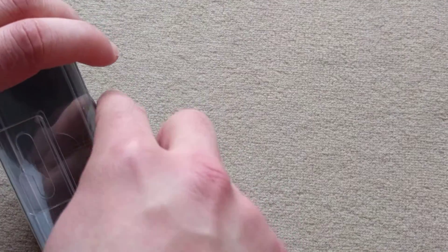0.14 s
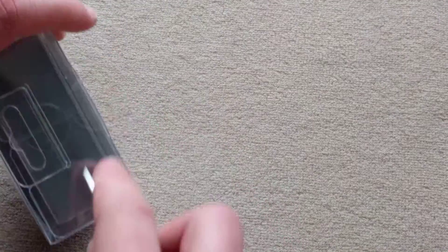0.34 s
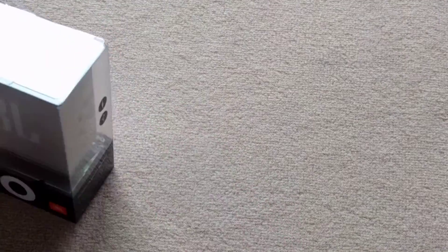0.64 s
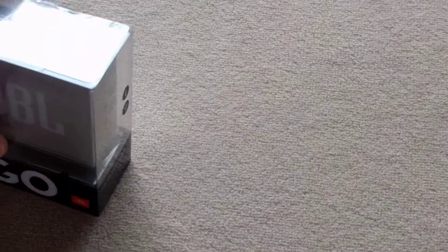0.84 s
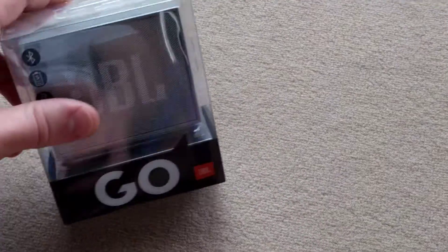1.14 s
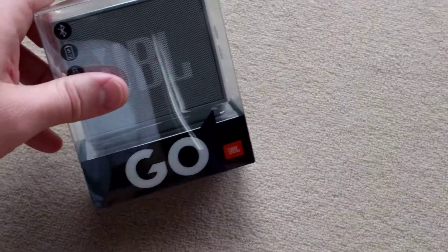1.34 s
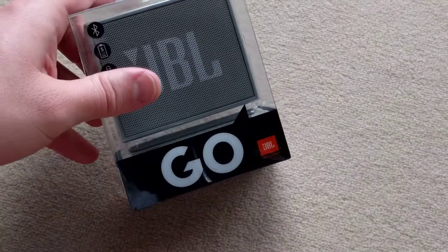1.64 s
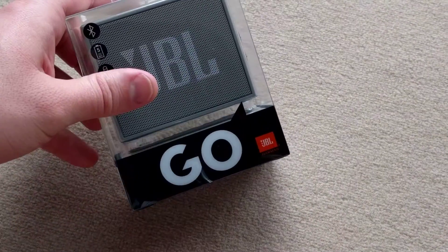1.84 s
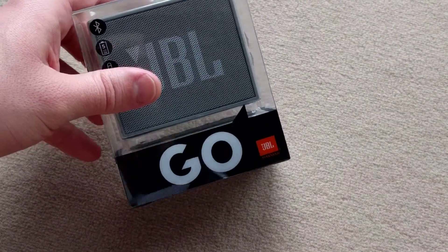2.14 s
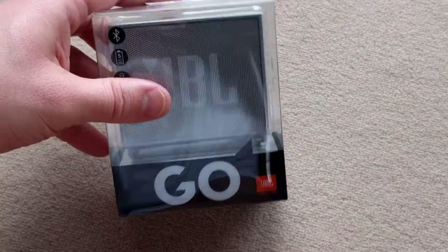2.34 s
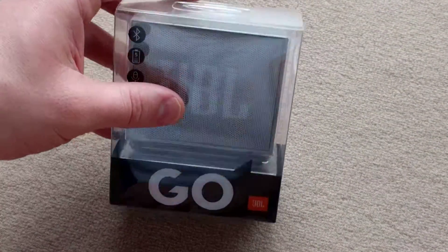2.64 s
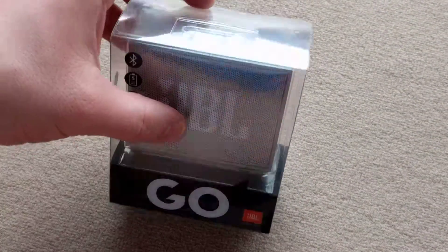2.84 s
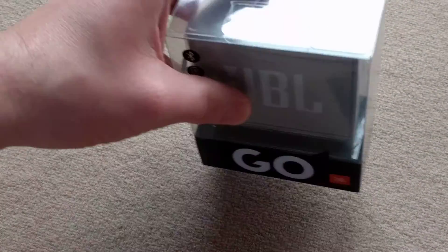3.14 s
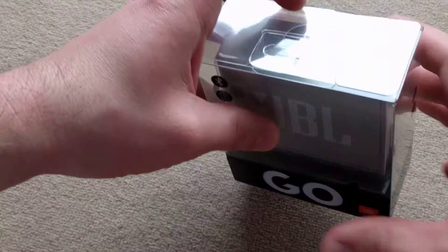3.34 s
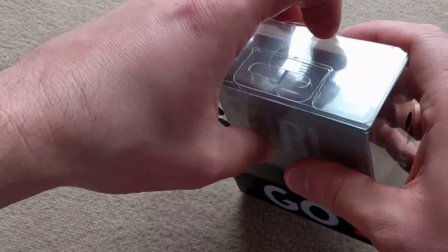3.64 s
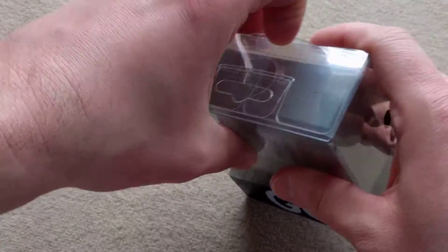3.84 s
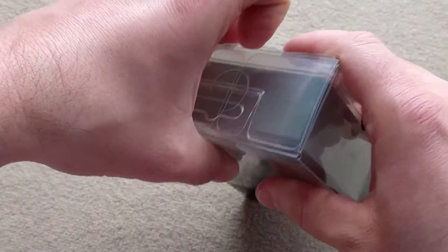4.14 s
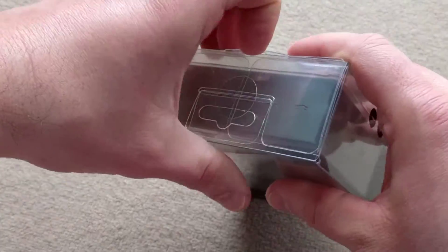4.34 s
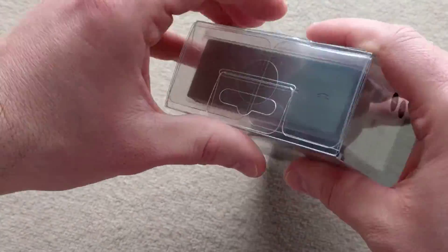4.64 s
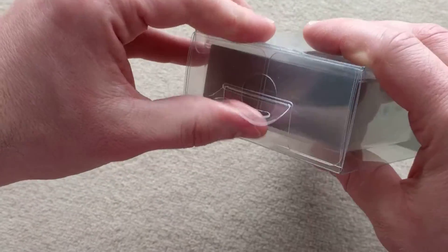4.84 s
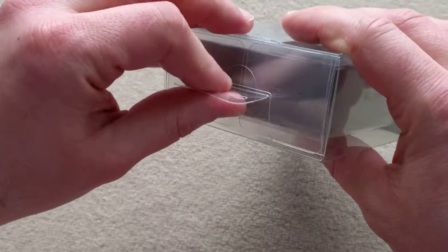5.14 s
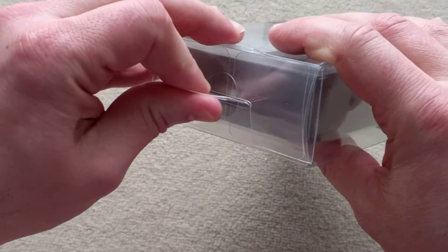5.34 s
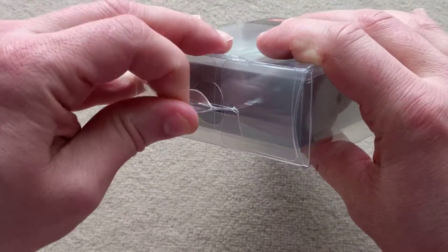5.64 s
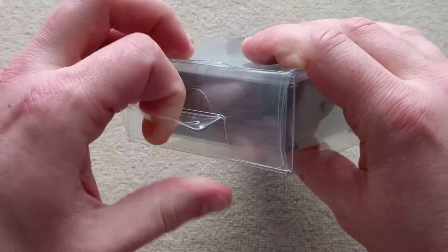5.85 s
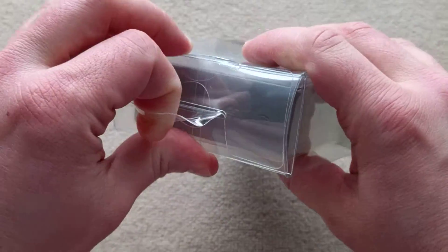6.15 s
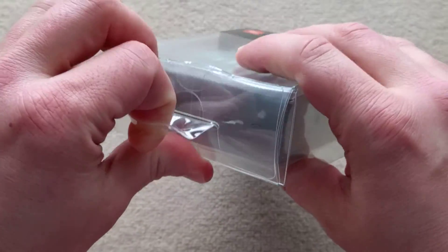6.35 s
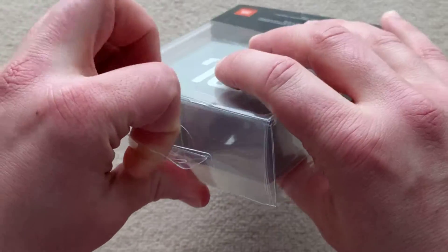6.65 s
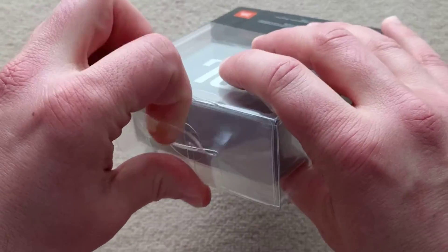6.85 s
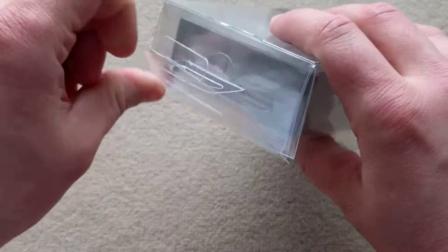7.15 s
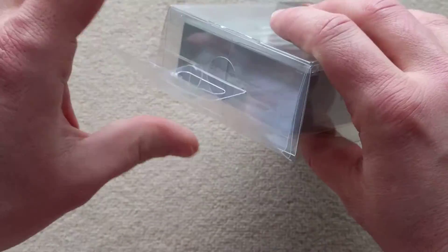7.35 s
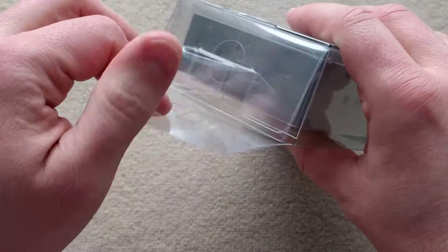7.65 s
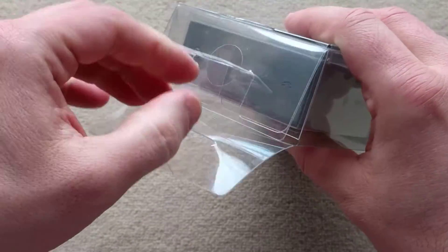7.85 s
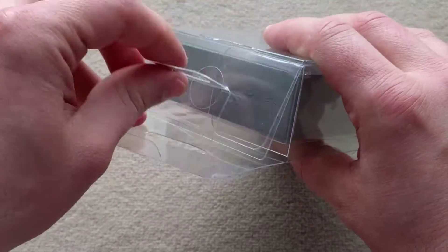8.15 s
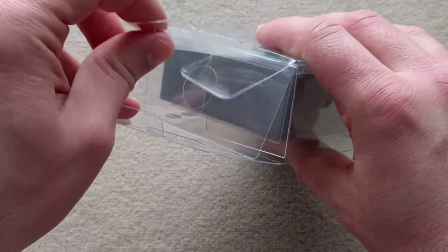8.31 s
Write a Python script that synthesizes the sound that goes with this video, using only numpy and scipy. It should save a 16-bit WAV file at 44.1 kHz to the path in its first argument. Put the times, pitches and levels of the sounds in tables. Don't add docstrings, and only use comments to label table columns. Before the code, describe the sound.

Hands turn and pry open a stiff clear plastic box up close; faint rustles, one sharp snap, then dense loud cracks as the lid bursts free.

```python
import sys
import numpy as np
from scipy import signal
from scipy.fft import rfft, irfft, next_fast_len
from scipy.io import wavfile
from scipy.ndimage import uniform_filter1d, map_coordinates

SR = 44100
rng = np.random.default_rng(int(sys.argv[2]) if len(sys.argv) > 2 else 0)


def amplitude_ratio(level_db):
    exponent = np.asarray(level_db, float) / 20
    return 10 ** exponent


def int16_out(signal):
    q = np.round(np.clip(np.atleast_2d(signal).T, -1, 1) * 32767)
    wavfile.write(sys.argv[1], SR, q.astype(np.int16))


N = 373968


def along(points, hz, column=1):
    rows = np.array(points)
    return np.interp(np.log(hz + 1), np.log(rows[:, 0] + 1), rows[:, column])


def unit(x):
    return x / np.sqrt(np.mean(x ** 2) + 1e-20)


def peak(x):
    return x / np.max(np.abs(x))


def hiss(spectrum, size=N):
    m = next_fast_len(size)
    gain = amplitude_ratio(along(spectrum, np.fft.rfftfreq(m, 1 / SR)))
    return unit(irfft(rfft(rng.standard_normal(m)) * gain, m)[:size])


def wobble(rate):
    knots = rng.standard_normal(int(N * rate / SR) + 4)
    return map_coordinates(knots, [np.arange(N) * rate / SR])


def ring(modes, t, spread, rise):
    x = np.zeros(len(t))
    for hz, t60 in modes:
        detune, level = rng.standard_normal(2)
        decay = amplitude_ratio(4 * level - 60 * t / t60)
        x += decay * np.sin(2 * np.pi * hz * (1 + spread * detune) * t)
    return peak(x * (1 - np.exp(-t / rise)))


def add(track, s, x):
    track[max(round(s * SR), 0):][:len(x)] += x


# frequency in Hz, level in dB per Hz.
SELF_NOISE = [(180, -31.5), (300, 1.5), (1480, -17), (4160, -14), (6620, -11.5), (16000, -4.5)]


def self_noise():
    return amplitude_ratio(-83.0) * hiss(SELF_NOISE)


# frequency in Hz, time to fall 60 dB in seconds, level in dB.
ROOM = [(200, 0.32, -0.5), (600, 0.24, -3), (1500, 0.22, -2), (4000, 0.28, -5), (7000, 0.21, -5),
        (14000, 0.13, 2.5)]


def tails(count):
    hz, t, z = signal.stft(rng.standard_normal((count, 14000)), SR, nperseg=256)
    decay_db = along(ROOM, hz, column=2)[:, None] - 60 * t / along(ROOM, hz)[:, None]
    x = signal.istft(z * amplitude_ratio(decay_db), SR, nperseg=256)[1][:, :14000]
    return x / np.linalg.norm(x, axis=1, keepdims=True)


# delay in seconds, level in dB.
WALLS = [(.0045, -16.5), (0.013, -23), (.035, -25.5)]


def room(hit, diffuse, wet_db):
    age = np.arange(len(diffuse)) / SR
    tail = amplitude_ratio(wet_db) * diffuse * (1 - np.exp(-age / 0.0098))
    early = np.zeros(3000)
    for delay, db in WALLS:
        early += amplitude_ratio(db + rng.normal(-15, 3) - 60 * np.abs(age[:3000] - delay) / 0.013)
    tail[:3000] += early * rng.standard_normal(3000)
    energy = np.cumsum(np.abs(rfft(hit, 16384)) ** 2)
    k = np.arange(8193)
    low, high = k / 1.1 - 10, np.minimum(k * 1.1 + 10, 8192)
    colour = np.sqrt((np.interp(high, k, energy) - np.interp(low, k, energy)) / (high - low))
    out = irfft(rfft(np.pad(tail, (40, 0)), 16384) * colour, 16384)[:15000]
    out[:len(hit)] += hit
    return out


# moment of most pressure in
# seconds, seconds to rise 20 dB, seconds to fall 20 dB, slide level in dB, rustle against the slide in dB.
STROKES = [(0.005, 0.2, 0.02, -74.5, 4.5), (0.081, 0.062, 0.1, -82.4, 8.5), (0.223, 0, 0.05, -69, 7.7),
           (0.448, 0.13, 0.78, -67.5, -2.5), (0.687, 0.45, 0.1, -77, -9.5),
           (1.075, 0.3, 0.07, -60.5, -2.2), (1.251, 0.13, 0.054, -67, 1), (1.438, 0.15, 0.12, -70, 1),
           (1.774, 0.1, 0.36, -78.9, 2.5), (2.104, 0.09, 0.18, -54.5, -22),
           (2.283, 0.24, 0.14, -65.5, -2), (2.479, 0.02, 0.13, -66, -9), (2.631, 0.04, 0.53, -70, 0.5),
           (2.787, 0.173, 0.12, -60.0, -18.0), (3.142, 0.05, 0.55, -64, -21.0),
           (3.428, 0.283, 0.2, -75.5, 7.5), (3.745, 0.202, 0.028, -63, 0.6),
           (3.857, 0.13, 0.04, -69.5, 0), (3.972, 0.12, 0.073, -64.5, -3),
           (4.162, 0.038, 0.055, -68.1, -1.5), (4.309, 0.15, 0.053, -71, 0.5),
           (4.488, 0.08, 0.0653, -64.5, 4), (4.745, 0.041, 0.043, -76.1, 4.5),
           (4.855, 0.1, 0.05, -76.0, 1.7),
           (5.013, 0.02, 0.17, -76.4, 2), (5.244, 0.02, 0.346, -81.0, 3.8), (5.396, 0.3, 0.1, -77, 6),
                (5.601, 0.0257, 0.13, -58.5, -10.5), (5.79, 0.08, 0.16, -66.5, 8.0),
                (6.149, 0.1, 0, -59, -1.5), (6.249, 0.1, 0.06, -65, -5.0), (6.46, 0.15, 0.7, -80.4, 7.6),
                (6.645, 0.351, 0.15, -66, 0.9), (6.794, 0.075, 0.064, -53.5, -5.3),
                (7.006, 0.01, 0.1139, -34.5, -13), (7.091, 0.139, 0.11, -50, 7.5),
                (7.297, 0.0142, 0.04, -39, -8), (7.352, 0.07, 0.1, -60.6, 5.5),
                (7.62, 0.21, 0.16, -54.5, -7.3), (7.913, 0.06, 0.13, -55.5, 0.5),
                (8.065, 0.098, 0.075, -51.5, -2.2), (8.253, 0.057, 0.08, -61, 1.8),
                (8.447, 0.06, 0.092, -59.0, -1)]


def strokes():
    roundness = 1.164
    t = np.arange(0, N, 32) / SR
    s, rise_s, fall_s, db, rustle_db = np.transpose(STROKES)[:, :, None]
    distance = np.abs(t - s) / np.where(t < s, rise_s, fall_s)
    swell = amplitude_ratio(db - 20 * distance ** roundness)
    return [np.interp(np.arange(N) / SR, t, gain.sum(axis=0)) for gain in (swell, amplitude_ratio(rustle_db) * swell)]


# frequency in Hz, level in dB per Hz.
RUMBLE = [(8.8, -21.5), (15, -5.5), (27, -13), (151, -14.5), (269, -22.5), (400, -33.5), (520, -52),
          (880, -120)]
# time in seconds, rumble level in dB.
SHAKE = [
    (0.0, -72),
    (0.9, -73),
    (1.5, -79),
    (1.96, -74.5),
    (2.4, -77),
    (3.4, -74.5),
    (4.6, -80),
    (5.4, -74),
    (7.04, -76),
    (8.48, -82),
]


def shaking(grip, slide_gain):
    level_db = np.interp(np.arange(N) / SR, *np.transpose(SHAKE))
    shake = amplitude_ratio(level_db + 1.2 * grip + 2.5 * wobble(9.9))
    return shake * slide_gain ** .26 * amplitude_ratio(20.5) * hiss(RUMBLE)


# frequency in Hz, level in dB per Hz.
SLIDE = [(1180, -37), (2000, -10), (2650, -12.5), (4510, -6.5), (7070, -4.5), (11200, -15.5),
         (15100, -15.5), (16500, -30)]
# frequency in Hz, level in dB per Hz.
RUSTLE = [(130, -31), (230, 0.5), (401, -2), (908, -3.5), (1290, -6), (3000, -12.5), (3900, -39.5),
          (6600, -120)]


def hands():
    slide_gain, rustle_gain = strokes()
    grip = wobble(25)
    slips = (rng.random(N) < 80 / SR) * rng.random(N)
    slip_decay = np.exp(-1 / (.0015 * SR))
    ticks = amplitude_ratio(1.5 * wobble(500)) + 1.1 * signal.lfilter([1], [1, -slip_decay], slips)
    slide = slide_gain * amplitude_ratio(1.8 * grip) * unit(ticks * hiss(SLIDE))
    rustle = rustle_gain * amplitude_ratio(1.1 * grip + 2.1 * wobble(48)) * unit(ticks * hiss(RUSTLE))
    return slide + rustle + shaking(grip, slide_gain)


# time in seconds, level in dB, pitch in Hz.
THUDS = [
    (3.47, -51, 55),
    (6.27, -47.5, 114.4),
    (6.54, -41.5, 140),
    (7.0, -38.5, 115),
    (7.3, -44, 124),
    (7.89, -47, 168.3),
    (8.035, -44, 130),
    (8.245, -43, 105),
    (8.4, -39.5, 115),
]


def thuds():
    out, t = np.zeros(N + SR), np.arange(4096) / SR
    for s, db, hz in THUDS:
        push = ring([(hz, .045), (2.197 * hz, .075)], t, spread=.01, rise=.006)
        add(out, s - .003, amplitude_ratio(db) * push)
    return out[:N]


# time in seconds, pitch in Hz, level in dB.
SQUEAKS = [
    (0.033, [(.984, 1600, -60), (.991, 1540, -40.5), (.9945, 1500, -49), (.9965, 1400, -44), (1.001, 1300, -55), (1.003, 1180, -52), (1.008, 1100, -70)]),
    (0.33, [(1.008, 830, -70), (1.013, 960, -54), (1.021, 1090, -50.5), (1.028, 1060, -56.5), (1.032, 1000, -53), (1.039, 900, -72)]),
    (.1, [(5.016, 1500, -70.5), (5.022, 1430, -51), (5.026, 935, -70.5), (5.034, 773, -54), (5.05, 750, -72)]),
    (0.91, [(8.188, 1980, -58), (8.195, 2095, -55), (8.203, 2085, -64), (8.21, 2280, -53), (8.228, 2320, -63)]),
]


def squeak():
    out, waver, flutter = np.zeros(N), wobble(390), wobble(250)
    for bright, rows in SQUEAKS:
        s, hz, db = np.transpose(rows)
        span = np.arange(round(s[0] * SR), round(s[-1] * SR))
        pitch = np.interp(span / SR, s, hz) * (1 + 0.053 * waver[span])
        phase = 2 * np.pi * np.cumsum(pitch) / SR
        tone = np.sin(phase) + bright * (np.sin(2 * phase) + np.sin(3 * phase))
        out[span] = amplitude_ratio(np.interp(span / SR, s, db) + 1.3 * flutter[span]) * tone
    return out


# frequency in Hz, time to fall 60 dB in seconds.
BOX = [(251, 0.065), (194, .04), (302.6, 0.048), (377, 0.049)]
# time in seconds, panel level in dB, panel pitch in Hz, box against it in dB.
KNOCKS = [(2.594, -47.5, 747, -23), (3.46, -50, 774, -16), (5.732, -65, 762, 6), (5.982, -63.5, 1130, -16),
          (6.13, -50, 730, -20), (6.151, -51, 714, -25), (6.222, -62, 690, -6), (6.396, -47.5, 730, 4.5),
          (6.441, -67, 742, 7.5), (7.522, -83, 703, 24.5), (8.25, -59.5, 803, -5)]


def knocks():
    out, t = np.zeros(N + SR), np.arange(4096) / SR
    for (s, db, hz, box_db), decay in zip(KNOCKS, tails(count=len(KNOCKS))):
        hit = ring([(hz, .028), (1.22 * hz, .02), (0.914 * hz, .02)], t, spread=0.0055, rise=0.006)
        hit += amplitude_ratio(box_db + 1) * ring(BOX[:1], t, spread=0.028, rise=0.0033)
        add(out, s - .0015, amplitude_ratio(db + 2.5) * room(hit, decay, wet_db=-3.5))
    return out[:N]


# frequency in Hz, level in dB.
TOP = [(7000, -31), (10000, 1.5), (13000, -5.5), (15500, -10), (16500, -37)]


def crack(hz, db, film, tab, t):
    rupture_s = .0006 * np.exp(0.08 * db)
    u = t / rupture_s
    burst = u * np.exp(-u) + 0.04 * np.exp(-t / 0.0063)
    hit = peak(burst * hiss(film, size=len(t)))
    hit += amplitude_ratio(-6.5) * ring([(hz, 0.015), (1.28 * hz, .008)], t, spread=.015, rise=0.00036)
    top_db = (-17 if tab else -20) + 2.9 * rng.standard_normal()
    hit += amplitude_ratio(top_db) * peak(burst * hiss(TOP, size=len(t)))
    return peak(hit)


# frequency in Hz, level in dB.
FLAP = [(700, -31.5), (1300, -3), (1720, -1), (2700, -9), (4000, -19.5)]
# frequency in Hz, time to fall 60 dB in seconds.
LID = [(1700, 0.033), (2650, 0.034), (5400, 0.026)]
# frequency in Hz, time to fall 60 dB in seconds.
PANEL = [(560, 0.03), (650, 0.013), (735, 0.045), (860, 0.034), (1000, 0.028), (1150, 0.0079)]


def box_body(flap_db, panel_db, loose, t):
    flap = t * np.exp(-t / 0.0022) * hiss(FLAP, size=len(t))
    box_db = panel_db - 8.5 + 6 * loose + 2.5 * rng.standard_normal()
    body = amplitude_ratio(flap_db + 1.5) * peak(flap)
    body += amplitude_ratio(flap_db - 4) * ring(LID, t, spread=0.07, rise=0.00057)
    body += amplitude_ratio(panel_db + 1.5) * ring(PANEL, t, spread=0.05, rise=0.0018)
    return body + amplitude_ratio(box_db) * ring(BOX, t, spread=.05, rise=0.0037)


# multiple of the crease pitch, level in dB.
CRACK = [(.25, -34), (.5, -9.5), (.8, -3.5), (1, 0), (1.25, -4), (1.6, -14.5), (2.4, -21), (4, -26)]
# time in seconds,
# crack peak in dB, flap against the crack in dB, panel against the crack in dB, crease pitch in Hz.
TAB = [
    (2.0458, -15.5, -45.5, -50, 6700),
    (2.0464, -8, -37.5, -47.5, 4900),
    (2.0468, -13, -45, -48, 6800),
    (2.0506, -19, -55, -60, 5410),
    (2.0588, -23, -55, -60, 5800),
]
# time in seconds, crack peak in
# dB, flap against the crack in dB, panel against the crack in dB, crease pitch in Hz.
CREASES = [(0.045, -41, -5, -27, 6350), (0.1802, -55.5, -12.5, -17, 6550), (0.219, -41.5, -13.5, -15, 6370),
           (0.4453, -54.5, -5.1, -18, 5400), (0.4611, -41.5, -10.5, -31, 6720),
           (0.7116, -45.5, -14, -33.5, 6570), (0.8228, -47.6, -6.0, -7.6, 3550),
           (0.875, -52.4, -6.0, -16.9, 4670), (1.7448, -45.3, -24, -34.5, 8010),
           (1.7795, -48.1, -33.7, -27.9, 5050), (1.8082, -57.2, -27.2, -20, 7040),
           (1.864, -48.5, -23.3, -24.7, 8050), (1.9702, -55.6, -15.7, -17.9, 6650),
           (2.5947, -44, -5, -2.8, 6270), (2.6342, -47, -21, -19, 5510), (2.9372, -36, -7.5, -23, 3620),
           (3.0463, -64.5, -20.3, -19.8, 6010), (3.1088, -60, -18.5, -21, 6460),
            (3.4406, -38.5, -3.5, -8.5, 4910), (3.4598, -41.5, -8, -2, 7320),
            (3.6294, -47.5, -6.2, -6.5, 6830), (3.6472, -18.5, -12.7, -21.3, 6200),
            (3.7028, -45.2, -29, -17.6, 3600), (3.8345, -59, -3.2, -12.5, 4910),
            (3.865, -49, -20.1, -37, 4520), (3.9434, -30, -12.5, -15.0, 6780),
            (3.9519, -33.5, -3.0, -16.4, 4700), (4.006, -36.5, -25, -41.2, 6070),
            (4.0198, -49.2, -11, -1.5, 5810), (4.1196, -39.2, -23.5, -30.1, 6100),
            (4.1614, -51.0, -2.5, -20.0, 5640), (4.2231, -58, -9.1, -4, 5250),
            (4.2709, -58.4, -20.8, -24.2, 5070), (4.3853, -44, -8.5, -14.7, 3550),
            (4.4353, -27.8, -10.5, -11.5, 5810), (4.449, -43.0, -22.8, -17.1, 5880),
            (4.7143, -57.8, -2, -18, 6480), (4.7383, -62.2, 0.5, -12.4, 6070),
            (4.8346, -55.6, -10.2, -14, 6370), (4.9972, -67, -5.5, -8.0, 3700),
           (5.0196, -53.3, -0.5, -1.8, 6090), (5.0669, -61.2, -21.0, -23.6, 5790),
           (5.0823, -67.9, -15.2, -12, 5840), (5.1962, -43.5, -7.5, -21, 3230),
           (5.2286, -49, -2.5, -14, 4030), (5.2648, -53.5, -16.4, -20.7, 6440),
           (5.2924, -56.9, -6.9, -14, 5840), (5.3141, -45.7, -9.5, -14.1, 5700),
           (5.3288, -59.5, -9.7, -26.7, 5880), (5.3364, -60.2, -17.5, -11.2, 6800),
           (5.3507, -60.4, -5.9, -26.7, 5960), (5.366, -40.5, -12.5, -46.7, 6400),
           (5.3842, -48, -14.6, -22, 4090), (5.4097, -47.5, -7, -17, 5750),
           (5.49, -52.5, -11.8, -14.7, 5340), (5.4974, -45.5, -7.5, -15.0, 7020),
           (5.5889, -52.5, -20.5, -22, 5150), (5.599, -52.5, -3.5, -7, 5250),
           (5.6085, -29.5, -12.5, -16, 5000), (5.6271, -42.1, -16.3, -13, 6440),
           (5.6425, -42, -10.0, -11.5, 3880), (5.7255, -45.5, -10, -23.9, 5900),
           (5.7573, -31.5, -16.3, -26.5, 3330), (5.7864, -32, -4, -17.5, 7800),
           (5.7903, -16.5, -19, -32.5, 7420), (5.8039, -34.0, -28.8, -23, 7700),
           (5.903, -60.8, -8.8, -6, 6180), (5.9196, -56.6, -12.6, -15.0, 6010),
           (5.9455, -46.5, -8.3, -11.5, 6550), (5.9825, -53, -6.6, -7, 5080),
           (6.0048, -47.7, -14, -13.7, 6180), (6.0311, -50.0, -4.0, -13.5, 7260),
           (6.0652, -32, -16.3, -17.3, 7220), (6.1583, -44.3, -12, -15, 7400),
           (6.207, -57, -14.2, -7, 5490), (6.262, -28.9, -10, -19.7, 5860),
           (6.3415, -56.4, 9.5, 5, 3270), (6.3682, -48.4, -1.6, -5.1, 3360), (6.3821, -37, -14.1, -20, 5300),
          (6.3958, -30, -10.5, -15.5, 6800), (6.44, -51.2, 2.3, -7.0, 3470),
          (6.4768, -34.8, -11, -20.5, 6330), (6.493, -39.0, -13.9, -21.1, 5450),
          (6.5168, -49.9, -1, -10.4, 3360), (6.534, -22, -17.5, -23, 5200), (6.6455, -26.5, -17, -28, 6030),
          (6.6583, -41, -6.2, -12.8, 5170), (6.7033, -40.5, -22, -22, 6740),
          (6.7156, -15, -17.5, -30.5, 5480), (6.7494, -38.5, -21.8, -22.7, 6830),
          (6.7701, -38.5, -24.3, -21, 6870), (6.8201, -22.5, -15.1, -24.5, 6330),
          (6.8516, -35, -4.7, -10.1, 5280), (6.8601, -26.5, -11.5, -17.5, 5400),
           (6.953, -12.5, -11.5, -20.5, 5420),
    (6.982, -25.7, -13, -15, 5800),
    (6.9851, -13.1, -30, -30.7, 6000),
    (6.9968, -7, -15, -20.5, 5480),
    (7.0224, -12.5, -15.5, -25.3, 6890),
    (7.0968, -16, -22.5, -32.3, 6090),
    (7.1216, -22.1, -13, -21, 7900),
           (7.2826, -19.5, -14, -28, 4080), (7.3082, -17.0, -17.8, -28.2, 7020),
             (7.3364, -25, -16.4, -23, 5300), (7.4436, -55.2, -5.7, -2.5, 4800),
             (7.4777, -58, 5.5, -9.2, 6600), (7.4814, -48, -6, -21, 3380), (7.496, -53.3, -12.7, -9, 4690),
             (7.6168, -38, -21.5, -28.8, 7860), (7.6613, -43, -8, -21.6, 6550),
             (7.724, -38, -18, -26, 6910), (7.7361, -50.6, -29.5, -29.3, 6910),
             (7.7576, -36.5, -16.5, -23, 7000), (7.7912, -50.8, -29, -25, 6830),
             (7.8459, -62, -12.5, -10, 6980), (7.8847, -24.5, -10.5, -7.5, 6520),
             (8.0273, -21.5, -11.2, -21.3, 7160), (8.0385, -25, -19.5, -16.3, 7000),
             (8.0458, -22.5, -24, -19.5, 6740), (8.1669, -55, -10.4, -14.6, 7450),
             (8.1705, -46.5, -10, -12.5, 7170), (8.2068, -30.5, -16.1, -29.0, 6180),
             (8.2445, -41.5, -4.3, -10, 6120), (8.2826, -49, -5, -12, 5450),
             (8.3095, -54.8, -13, -28.0, 6520), (8.3189, -54.5, -20.1, -13, 7540),
             (8.3325, -52.6, -10.3, -23.1, 5170), (8.3728, -50.7, -13.2, -17.8, 5000),
             (8.4034, -22.5, -6, -32.9, 7550), (8.4154, -30, -21.0, -27, 5660),
           (6.1206, -41, -23.4, -21, 7200), (6.135, -50.7, -8, -15.1, 7000),
             (6.2288, -46, -5, -7.7, 7700), (6.5384, -23.0, -16.5, -18.3, 6540),
             (6.5425, -25.7, -17, -18, 7000), (6.9878, -17.8, -23, -33, 5600),
             (6.9935, -16, -24.0, -32, 9500), (6.9993, -8.0, -11.5, -23.5, 4000),
             (7.0018, -14, -12.5, -20, 6000), (7.0074, -18.3, -9.1, -13.5, 7300),
             (7.0117, -13, -14.0, -19.7, 7200), (7.0255, -18.5, -13.5, -18, 6470),
             (7.0587, -25.6, -19.5, -25.3, 7000), (7.1185, -27.2, -15, -19, 9000),
             (7.287, -20.5, -16, -28.0, 6480), (7.3017, -32, -15, -19, 7500),
             (7.3133, -22, -20.6, -26, 7300), (7.3345, -30, -23.3, -29.6, 9950),
             (7.631, -40.5, -10, -12, 7000), (7.672, -40.4, -16, -37, 7400),
             (7.8885, -29.4, -7.5, -7, 6550), (7.917, -38, -15.3, -26.8, 7000),
             (7.992, -38, -23.4, -31.4, 7500), (8.032, -22.5, -14.5, -17.3, 7120),
             (8.1948, -32.5, -15, -24.5, 6200), (8.4072, -26.6, -6, -20, 5960)]


def snaps():
    out, t = np.zeros(N + SR), np.arange(4096) / SR
    film_hz, loose_s = 6430, 5.55
    decays = tails(count=16)
    creases = TAB + CREASES
    for k, (s, db, flap_db, panel_db, hz) in enumerate(creases):
        tab = k < len(TAB)
        film = np.array(CRACK) * [np.sqrt(hz * film_hz), 1.7 if tab else 1]
        hit = crack(hz, db, film, tab, t) + box_body(flap_db, panel_db, s > loose_s, t)
        heard = room(hit, decays[k % len(decays)], wet_db=-3.5 if tab else -6)
        add(out, s - .0002, amplitude_ratio(db - 0.59) * heard)
        lead_in = np.hanning(260) * hiss(film, size=260)
        add(out, s - .005, amplitude_ratio(db - 40) * lead_in)
    return out[:N]


def scene():
    return (hands() + thuds() + squeak() + knocks() + snaps())[None]


def top_cut(x):
    return signal.sosfilt(signal.butter(12, 16850, fs=SR, output="sos"), x)


def record(dry):
    x = dry + self_noise()
    f, port_hz, width_hz = np.fft.rfftfreq(N, 1 / SR), 7200, 900
    port = 1 + 0.54 * 1j * f * width_hz / (port_hz ** 2 - f ** 2 + 1j * f * width_hz)
    edge = np.interp(f, [15700, 15900, 16600, 16700], [1, .07, .07, 0])
    level_db = 10 * np.log10(np.abs(uniform_filter1d(x ** 2, size=2000)) + 1e-12)
    gate = np.interp(level_db, [-84, -72], [.2, 1])
    drift = (-.0007 + .0002 * wobble(2.5)) * gate
    mix = irfft(rfft(x) * port * edge, N) + drift
    return top_cut(mix)


dry = scene()
out = record(dry)
int16_out(out)
```